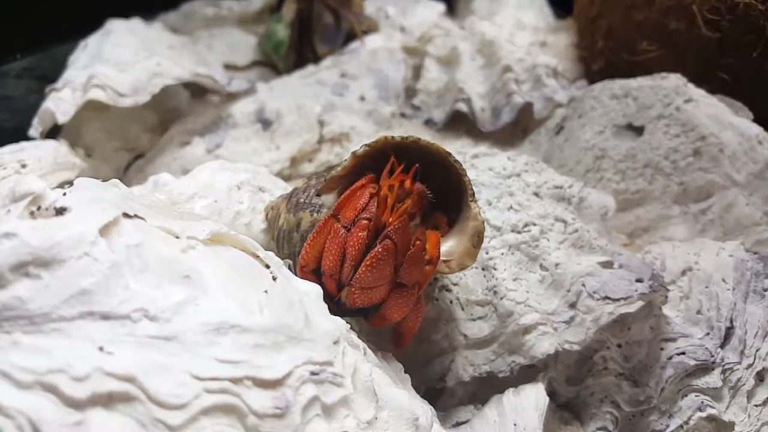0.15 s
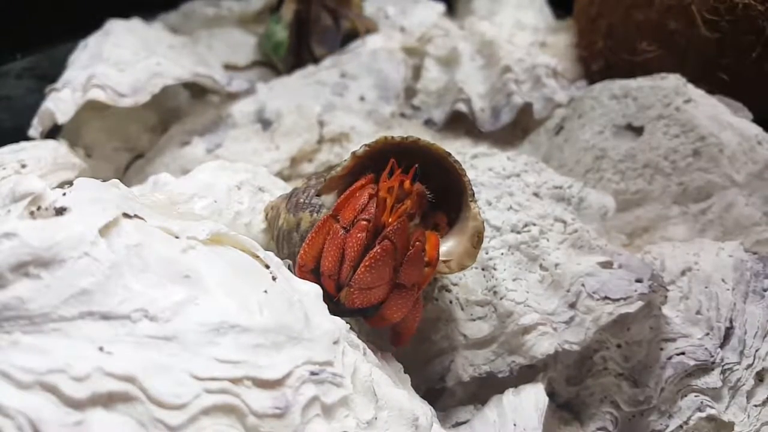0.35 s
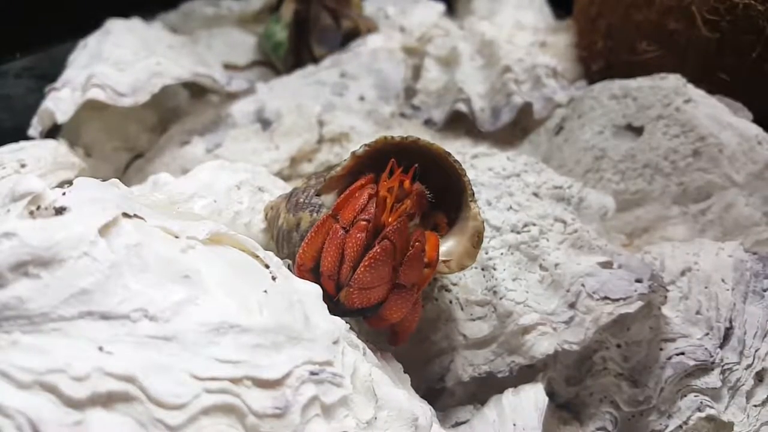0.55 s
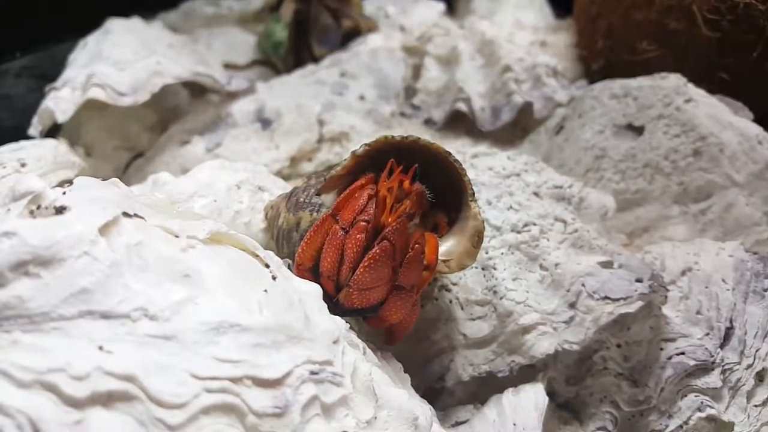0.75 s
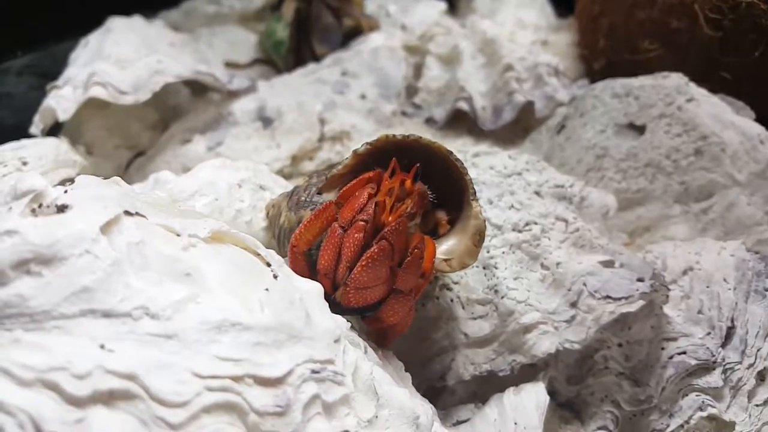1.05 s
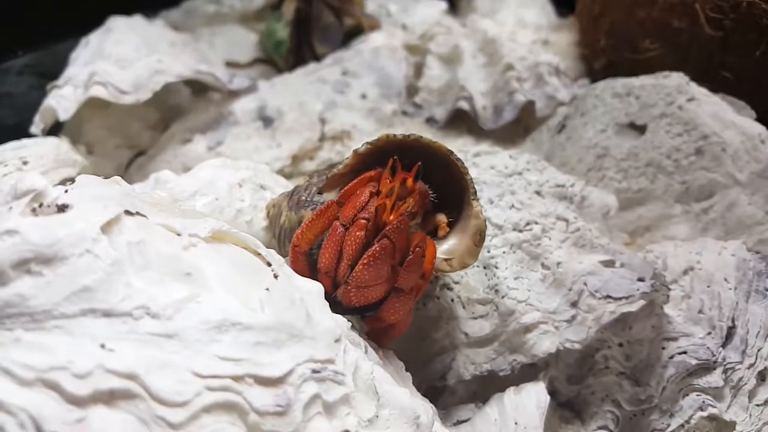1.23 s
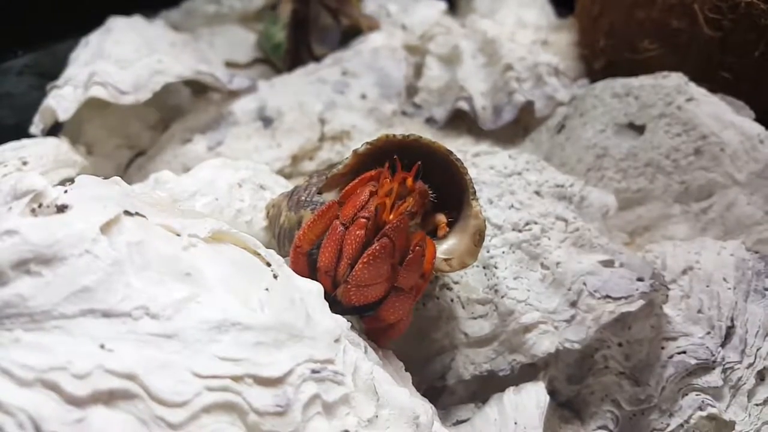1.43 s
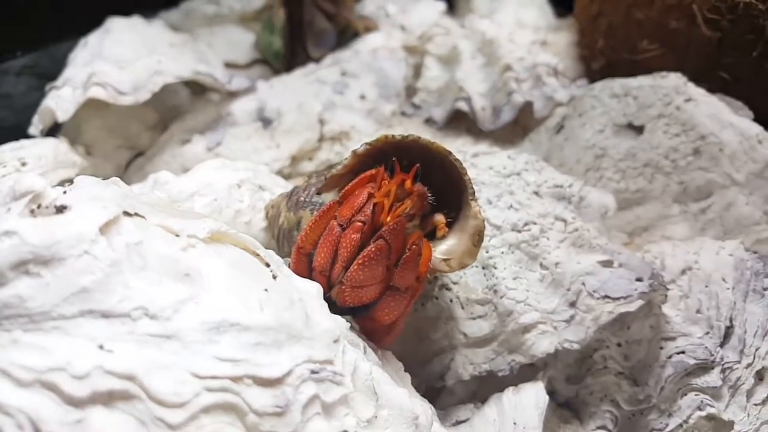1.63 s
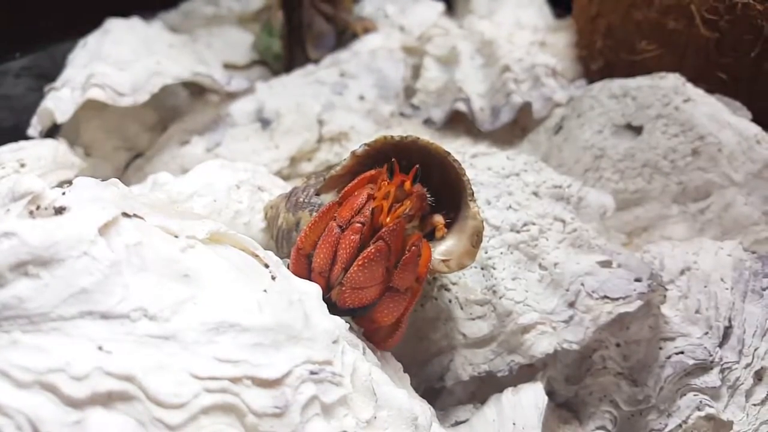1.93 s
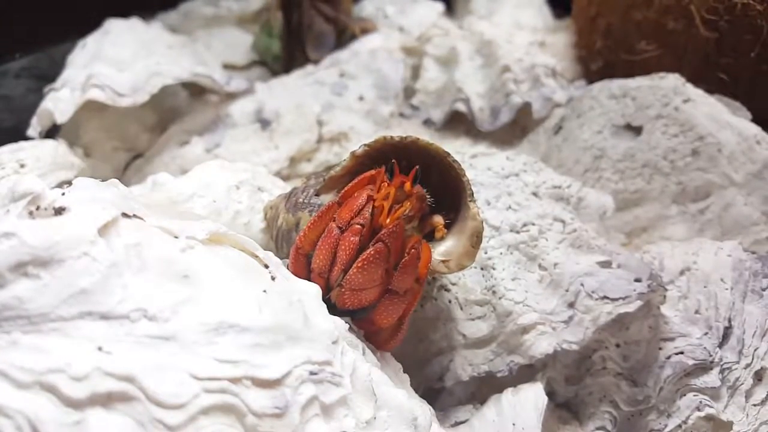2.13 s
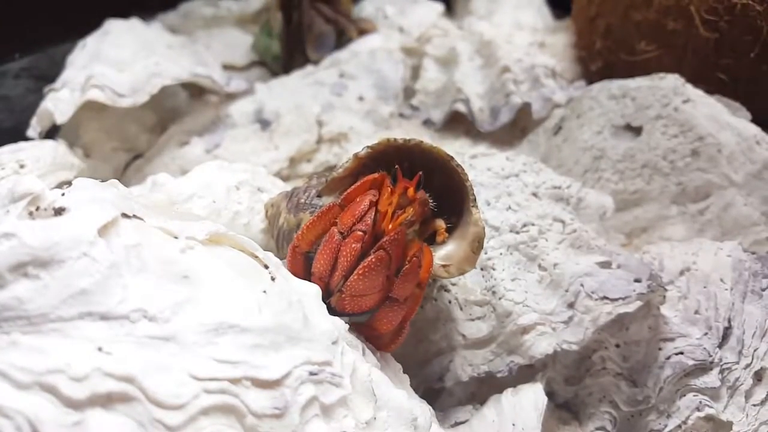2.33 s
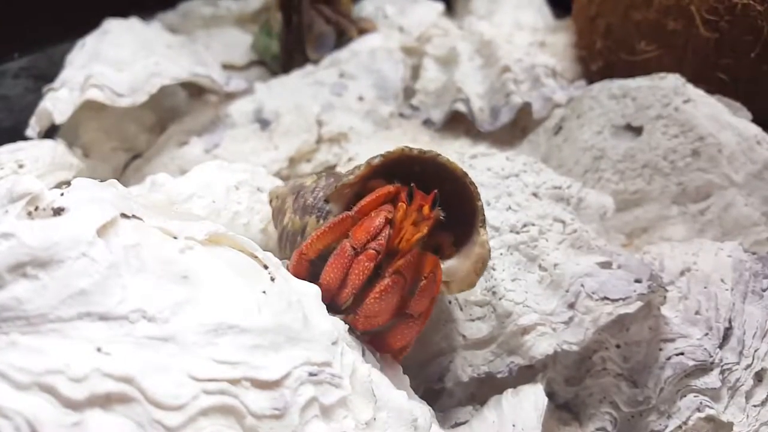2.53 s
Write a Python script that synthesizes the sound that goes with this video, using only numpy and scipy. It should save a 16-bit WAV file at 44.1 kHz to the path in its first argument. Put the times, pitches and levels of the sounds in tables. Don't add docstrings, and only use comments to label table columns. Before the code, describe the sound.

A hermit crab moves on coral rock, close and left. Faint rubbing and a soft bump open; sparse leg ticks start at 0.4 s, strongest near 0.6. Shell knocks and clicks cluster at 0.9-1.0, with low bumps near 1.3 and 1.5. Busy ticks and scraping fill 1.55-1.83, then near quiet until hollow knocks, pings and scrapes at 2.45-2.68. Low hum, rumble and hiss continue; a barely audible whine stops around 0.7.

```python
import sys
import numpy as np
from scipy import signal
from scipy.io import wavfile

SR = 44100
rng = np.random.default_rng(int(sys.argv[2]) if len(sys.argv) > 2 else 0)


def invert_db(x):
    u = np.asarray(x, float) / 20
    return 10 ** u


def master(y):
    cut = np.clip(np.atleast_2d(y).T, -1, 1)
    pcm = np.round(cut * 32767)
    wavfile.write(sys.argv[1], SR, pcm.astype(np.int16))


N = 118188

TOUCH_DELAY_S = .0009
RIGHT_ONLY = np.array([[0], [1]])

# frequency in Hz, level in dB, T60 in seconds.
SHELL_MODES = [(4500, 0.5, 0.0028), (5580, -3.5, 0.012), (6410, 4, 0.0081), (7300, 1.5, 0.0061),
               (7500, 7, 0.0022), (8760, 7, 0.0036), (9650, 7.5, 0.0017), (12400, 1.5, 0.0014),
               (14300, -12, 0.0021)]


def rms_one(x):
    return x / np.sqrt(np.mean(x ** 2) + 1e-20)


def at_hz(points, hz):
    table = np.array(points)
    return np.interp(np.log(hz), np.log(table[:, 0]), table[:, 1])


def drift(rate):
    r = np.exp(-80 * np.pi * rate / SR)
    white = rng.standard_normal(N // 40 + 2002)
    slow = signal.lfilter([1], [1, -2 * r, r * r], white)[2000:]
    return np.interp(np.arange(N) / 40, np.arange(len(slow)), rms_one(slow))


def ring(clicks, hz, t60):
    r, w = invert_db(-60 / (t60 * SR)), 2 * np.pi * min(hz, .45 * SR) / SR
    return signal.lfilter([0, np.sin(w)], [1, -2 * r * np.cos(w), r * r], clicks + 1e-18)


def broad(clicks, hz, width_hz):
    return ring(clicks, hz, np.log(1000) / (np.pi * width_hz))


def band_pass(x, low_hz, high_hz, order):
    return signal.sosfilt(signal.butter(order, [low_hz, high_hz], "band", fs=SR, output="sos"), x)


def top_cut(x, stop_hz):
    return signal.sosfilt(signal.cheby2(16, 40, stop_hz, fs=SR, output="sos"), x)


def grains(per_s, spread_db):
    sizes = invert_db(spread_db * np.minimum(rng.exponential(1, N), 4))
    sizes = sizes * rng.choice([-1, 1], N)
    return rms_one(sizes * (rng.random(N) < per_s / SR))


def jar(length_s):
    contacts = rng.standard_normal(3000) * (rng.random(3000) < 6000 / SR)
    contacts[0] = 1.5
    phase = np.clip(.35 + 0.55 * np.arange(3000) / SR / max(length_s, .0005), 0, 1)
    contacts = contacts * np.sin(np.pi * phase)
    return contacts / np.linalg.norm(contacts)


def shell(clicks, scatter):
    out = 0
    for k, ((hz, db, t60), (a, b)) in enumerate(zip(SHELL_MODES, scatter)):
        mode = ring(clicks, hz * (1 + .015 * b), t60)
        out = out + invert_db(db + 2 * a) * mode * (-1) ** k
    return out


def ticks():
    # start in seconds, peak in dB, pitch in Hz, low body in dB.
    leg_taps = [(0.4052, -50.5, 7300, -1.5), (0.4267, -58, 7800, -8), (.494, -68, 7300, -15),
                (0.555, -57, 7250, -8), (0.5944, -41.5, 7330, -9.5), (0.7113, -47, 7430, -8),
                (.7135, -58, 6960, -11), (.7682, -63, 9180, -15), (0.8648, -63, 9000, -15),
                (.8955, -55, 5160, -4), (.9585, -56, 15000, -20), (.9597, -43, 7600, -5),
                (1.269, -54, 7500, -8), (1.27, -57, 5200, -6), (1.5626, -46.5, 7300, -6),
                (1.594, -47.5, 7250, -3), (1.61, -60, 8300, -10), (1.6415, -66, 11000, -15),
                (1.653, -73, 6500, -10), (1.6598, -56, 8000, -6), (1.6724, -55, 7800, -3),
                (1.6836, -55, 5500, 2), (1.6838, -58, 13800, -20), (1.6908, -56, 8800, -12),
                (1.702, -67, 6000, -10), (1.718, -61, 11600, -18), (1.728, -60, 7300, -10),
                (1.7824, -50, 11750, -20), (1.7828, -53, 14300, -20), (1.83, -55, 8000, -5),
                (2.4715, -62, 5000, -12), (2.487, -66, 8500, -8), (2.571, -58, 5000, -10),
                (2.605, -54, 6500, -10), (2.6042, -68, 8300, -15)]
    width_hz, body_hz, body_width_hz = 2050, 2400, 1200
    click = np.eye(1, 2000)[0]
    body = broad(broad(click, body_hz, body_width_hz), body_hz, body_width_hz)
    body = body / abs(body).max()
    out = np.zeros(N + 2000)
    for s, db, hz, body_db in leg_taps:
        snap = broad(broad(click, hz, width_hz), hz, 2 * width_hz)
        snap = snap + invert_db(-9) * ring(click, hz, 0.0079)
        snap = snap / abs(snap).max()
        snap = snap - invert_db(-23) * ring(click, .83 * hz, 0.0088)
        snap = snap + invert_db(1) * click
        snap = band_pass(snap, .72 * hz, min(1.29 * hz, .45 * SR), 4)
        out[int((s + TOUCH_DELAY_S) * SR):][:2000] += invert_db(db) * (snap + invert_db(body_db) * body)
    return out[:N]


def knocks():
    # start in seconds, peak in dB, length in seconds, hollow pitch in Hz, bright modes in dB.
    shell_jars = [(0.663, -65.5, .004, 2820, -18), (0.8955, -59.5, 0.003, 3070, -7.5),
                  (0.921, -58, 0.0025, 2430, -22), (0.9597, -53.5, 0.0029, 2430, -7),
                  (0.9606, -53, 0.0033, 3160, -15), (0.9695, -57, 0.0026, 2500, -10),
                  (0.982, -63.5, 0.0071, 2550, -12), (1.004, -52, 0.005, 2820, -12),
                  (1.073, -66, 0.0033, 3000, -8.5), (1.157, -76, 0.0022, 3020, -2),
                  (1.268, -58, 0.0038, 3100, -6.5), (1.3, -65, 0.0039, 2230, -18),
                  (1.775, -67.5, 0.0035, 2900, -5), (1.828, -65.5, 0.0037, 3170, -5),
                  (2.46, -59.5, 0.0018, 2940, -28), (2.471, -64, 0.0019, 2900, -16),
                  (2.569, -73, 0.0048, 2900, -5), (2.578, -67, 0.0039, 2980, -20),
                  (2.601, -65, 0.0038, 2900, -3), (2.627, -58.5, 0.0031, 3040, -19),
                  (2.655, -61, 0.01, 2900, 0), (2.675, -59, 0.0035, 2920, -6)]
    out = np.zeros(N + 3000)
    for s, db, length_s, hz, bright_db in shell_jars:
        hit = jar(length_s)
        bright = shell(hit, rng.standard_normal((len(SHELL_MODES), 2)))
        bright = bright + invert_db(-2) * broad(hit, 6300, 7200)
        hollow = ring(hit, hz, .009)
        snap = invert_db(-6) * broad(hit, 2500, 3400)
        knock = hollow / abs(hollow).max() + snap + invert_db(bright_db) * bright
        out[int((s + TOUCH_DELAY_S) * SR):][:3000] += invert_db(db + 4) * knock
    return out[:N]


def pings():
    # start in seconds, peak in dB, frequency in Hz, length in seconds.
    thin_modes = [(.897, -52, 13310, .0008), (.9604, -53, 2450, .003), (.9625, -54, 3050, .003),
                  (.9628, -58, 13310, .001), (.9712, -60, 13340, .004), (.971, -62, 9200, .003),
                  (1.54, -69, 4600, .015), (1.606, -67, 4800, .008), (1.625, -67, 4750, .01),
                  (1.643, -63, 4800, .004), (1.687, -65, 4750, .005), (1.703, -64, 4800, .005),
                  (1.715, -70, 4800, .02), (2.459, -67, 8050, .003), (2.469, -62, 1250, .006),
                  (2.57, -68, 8050, .002), (2.581, -63, 4700, .005), (2.581, -65, 10150, .003),
                  (2.592, -66, 4600, .008), (2.666, -59, 1250, .004), (2.659, -62, 6600, .004),
                  (2.676, -61, 10000, .003), (1.2975, -69, 4760, .01), (1.3615, -70, 4810, .01),
                  (2.5805, -67, 8010, .025), (2.6565, -51, 7935, .009), (2.6575, -61, 10210, .005),
                  (2.6605, -56, 5740, .007), (1.2705, -54, 3170, .003), (1.832, -65, 5800, .002),
                  (1.829, -65, 8000, .004), (2.58, -60, 3010, .005), (2.61, -65, 2900, .02),
                  (2.6755, -56, 2950, .003), (2.629, -56, 3080, .004), (.8975, -63, 9000, .002),
                  (.8995, -62, 5700, .002), (1.005, -61, 9000, .003), (1.0055, -60, 6600, .003),
                  (.596, -61, 1200, .012), (.993, -60, 1180, .005), (1.013, -59, 1170, .015),
                  (1.39, -66, 2200, .02)]
    out = np.zeros(N + 3000)
    for s, db, hz, length_s in thin_modes:
        ping = ring(jar(length_s), hz, .012)
        out[int(s * SR):][:3000] += invert_db(db) * ping / abs(ping).max()
    return out[:N]


def scrapes():
    # start in seconds, length in seconds, level in dB, main mode in Hz, its level in dB.
    strokes = [
        (1.564, 0.041, -74, 7310, 11),
        (1.535, 0.21, -77.5, 4800, -6),
        (1.595, .11, -78, 8700, -5),
        (2.456, .045, -72.5, 2800, 8),
        (2.566, .12, -78, 2940, 6),
    ]
    t, out = np.arange(N) / SR, 0
    for s, length_s, db, hz, main_db in strokes:
        grit = grains(2000, 2.5) * invert_db(2.5 * drift(50))
        body = rms_one(shell(grit, np.zeros((len(SHELL_MODES), 2))))
        body = body + invert_db(main_db) * rms_one(broad(grit, hz, 290))
        swell = np.sin(np.pi * np.clip((t - s) / length_s, 0, 1))
        stroke = np.maximum(swell - 1e-9, 0) ** 0.29
        out = out + invert_db(db) * body * stroke / np.sqrt(np.mean(body[stroke > 0] ** 2))
    return out


def tank(x):
    tail = rng.standard_normal((2, 3000)) * invert_db(-60 * np.arange(3000) / SR / 0.038)
    tail[:, :60] = 0
    tail = tail / np.linalg.norm(tail, axis=1)[:, None]
    return invert_db(-12) * signal.fftconvolve(x[None], tail, axes=1)[:, :N]


def two_sides(x):
    lag_samples, dull_hz, right_db = 10, 8800, -12.5
    dull = np.exp(-2 * np.pi * dull_hz / SR)
    right = signal.lfilter([1 - dull], [1, -dull], np.roll(x, lag_samples)) * invert_db(right_db)
    return np.array([x, right])


def drag():
    # time in seconds, rub level in dB.
    rub = [(0, -74.5), (.25, -76.5), (.31, -68.5), (.38, -76), (.55, -75), (.60, -70.5), (.72, -67.5),
           (.78, -75.5), (.93, -75), (.97, -65), (1.09, -65), (1.16, -70), (1.52, -66.5), (1.64, -64),
           (1.8, -70.5), (2.36, -77.5), (2.46, -68), (2.68, -83.5)]
    # frequency in Hz, width in Hz, level in dB.
    rock = [(364, 174, 0), (761, 60, -4.5), (1136, 100, 2), (1283, 40, -2.5), (1500, 177, 0),
            (2167, 490, -1.5), (2900, 520, -9)]
    # time in seconds, lift of the outer resonances in dB.
    weight = [(0, -2), (.9, -1), (1.15, -3.5), (1.4, 2), (1.75, 4), (1.9, -1.5), (2.68, 0.5)]
    t, out, alike = np.arange(N) / SR, 0, 0.35
    for k, (hz, width_hz, db) in enumerate(rock):
        shared, *own = (broad(grains(2500, 2.5), hz, width_hz) for _ in range(3))
        lift_db = np.interp(t, *np.transpose(weight)) * (k not in (2, 3, 4))
        out = out + invert_db(db + lift_db) * rms_one(alike * shared + (1 - alike) * np.array(own))
    rub_db = np.interp(t, *np.transpose(rub)) + 1.2 * drift(4.9) - 4
    return invert_db(rub_db - 2.5 * RIGHT_ONLY) * out


def bumps():
    # start in seconds, peak in dB, frequency in Hz.
    pushes = [(.723, -57, 386), (.724, -62, 464), (1.29, -63, 300), (1.585, -54.5, 198), (.08, -60, 252),
              (2.199, -57, 58), (0.996, -66, 318), (1.272, -53, 336), (1.277, -51.5, 196),
              (1.459, -59, 303), (1.499, -50.5, 173), (1.557, -59, 328), (1.617, -55, 178),
              (1.718, -57.5, 185)]
    t60_s, soft_hz = 0.096, 151
    soft = np.exp(-2 * np.pi * soft_hz / SR)
    contact = signal.lfilter([1], [1, -soft], np.eye(1, 6000)[0])
    out = np.zeros(N)
    for s, db, hz in pushes:
        push = ring(contact, hz, t60_s)
        out[int(s * SR):][:6000] += invert_db(db) * (push - push.mean()) / abs(push).max()
    return out


def hum():
    # multiple of the hum frequency, level in dB relative to the hum.
    partials = [(.51, -29), (2.01, -35.5), (4.0, -34.5)]
    hum_hz, start_rad, right_lead_rad = 119.96, -.09, .27
    turn = 2 * np.pi * hum_hz * np.arange(N) / SR + start_rad + right_lead_rad * RIGHT_ONLY
    tone = np.cos(turn)
    for k, db in partials:
        multiple = round(2 * k) / 2
        tone = tone + invert_db(db + 1.8 * drift(2.0)) * np.cos(multiple * turn)
    return tone * invert_db(-41.5 + 0.35 * drift(28) - 1.43 * RIGHT_ONLY)


def whine():
    t, whine_hz, end_s = np.arange(N) / SR, 10700, .72
    return invert_db(-96 + 4.0 * drift(22)) * np.sin(2 * np.pi * whine_hz * t) * (t < end_s)


def banded_noise(spectrum, patchy_db):
    # frequency in Hz, left-right correlation of the room noise (no unit).
    likeness = [(60, 0.47), (180, 0.64), (550, 0.45), (1650, -0.24), (4970, -0.075), (15000, -0.15)]
    low, high = np.log2(spectrum[0][0]), np.log2(min(spectrum[-1][0], .45 * SR))
    edges, out = 2 ** np.linspace(low, high, 17), 0
    white = rng.standard_normal((2, 2, N + SR // 2))
    for k, (a, b) in enumerate(zip(edges, edges[1:])):
        mid, side = band_pass(white[k % 2], a, b, 2)[:, -N:]
        centre_hz = np.sqrt(a * b)
        alike = np.clip(at_hz(likeness, centre_hz), -1, 1)
        gain = invert_db(at_hz(spectrum, centre_hz) + patchy_db * drift(4.7))
        out = out + gain * (np.sqrt(1 + alike) * mid + np.sqrt(1 - alike) * side * [[1], [-1]])
    return rms_one(out)


def noise_floor():
    # frequency in Hz, density in dB per Hz.
    rumble = [(20, -5.5), (40, -25.5), (62, -9.5), (95, -0.5), (180, -3.5), (320, -16), (550, -17),
              (1000, -27.5)]
    # frequency in Hz, density in dB per Hz.
    hiss = [(500, -19.5), (800, -9), (1250, -6), (2800, -10.5), (3900, -14.5), (7000, -18.5),
            (10000, -19.5), (19000, -13.5)]
    floor = invert_db(-65) * banded_noise(rumble, patchy_db=2.0)
    floor = floor + invert_db(-70.5) * top_cut(banded_noise(hiss, patchy_db=0.33), 15950)
    return floor * invert_db(-0.5 * RIGHT_ONLY)


def scene():
    crab = ticks() + knocks() + pings() + top_cut(scrapes(), 15950)
    near = invert_db(4.0) * (two_sides(crab) + tank(crab)) + drag() + bumps()
    return near + hum() + whine() + noise_floor()


def roll_off(x):
    return signal.sosfilt(signal.butter(12, 16450, fs=SR, output="sos"), x)


def record(dry):
    mix = top_cut(dry, 16500) - .0006
    return roll_off(mix)


dry = scene()
out = record(dry)
master(out)
```